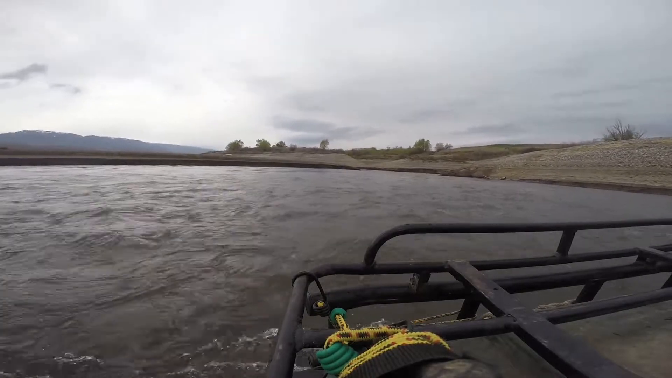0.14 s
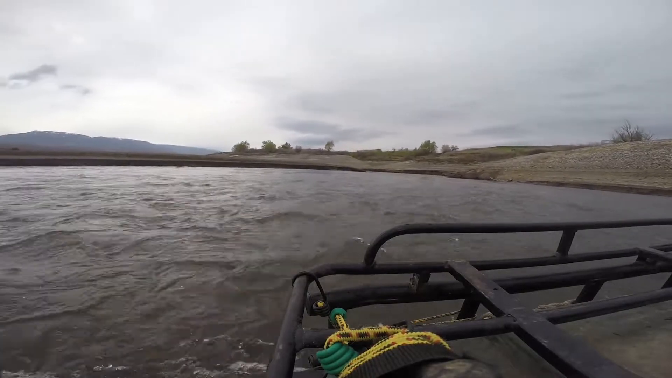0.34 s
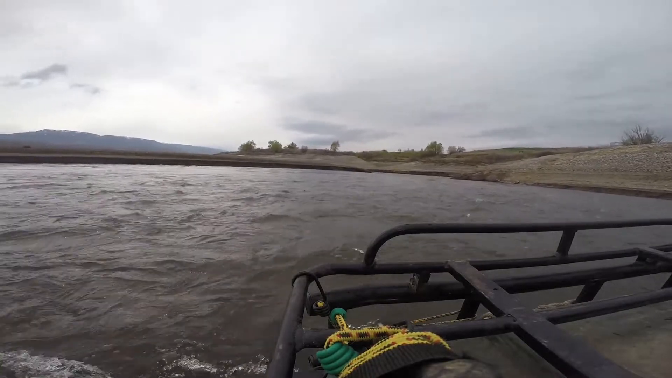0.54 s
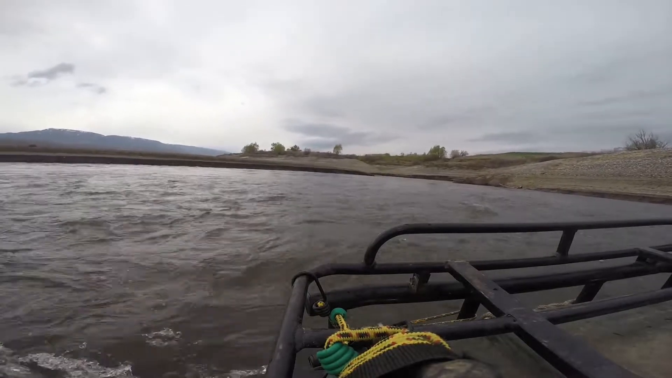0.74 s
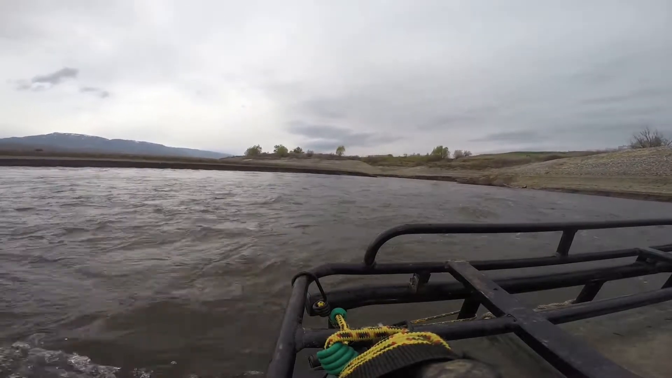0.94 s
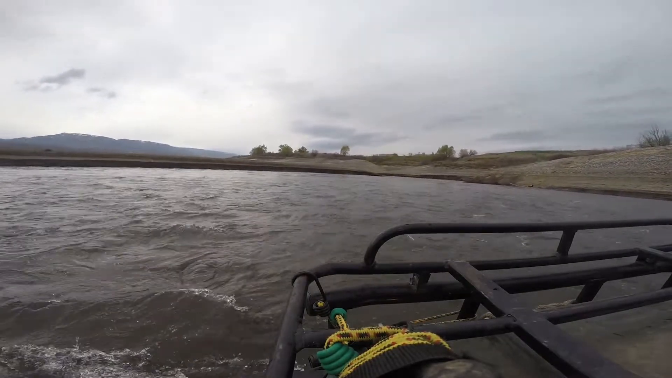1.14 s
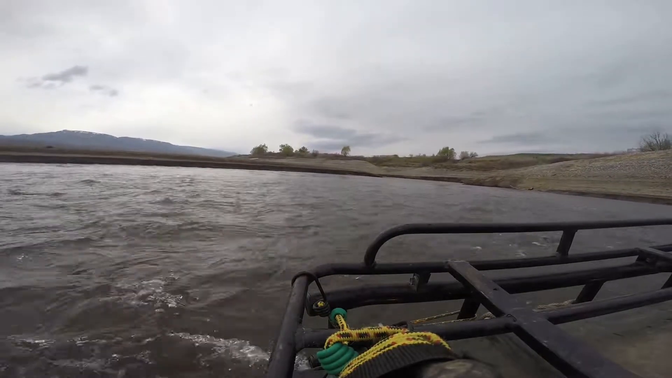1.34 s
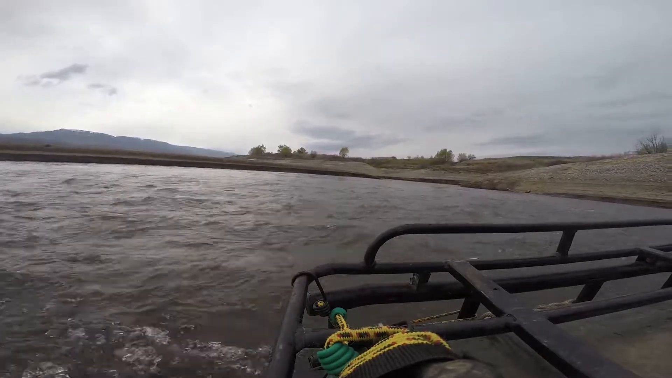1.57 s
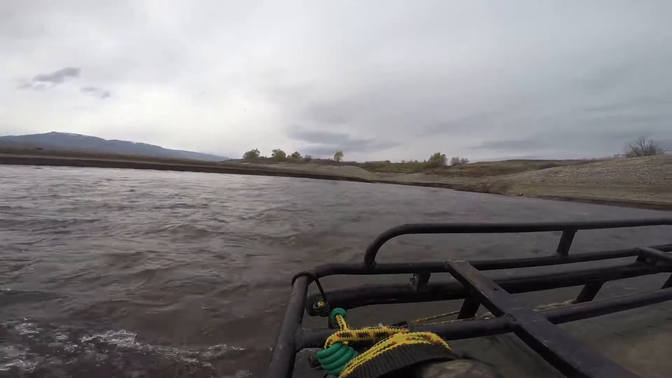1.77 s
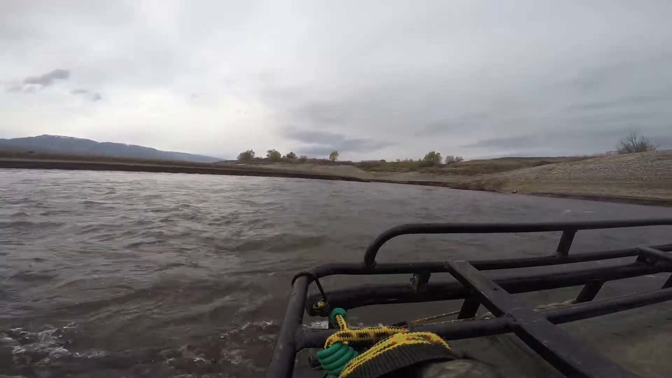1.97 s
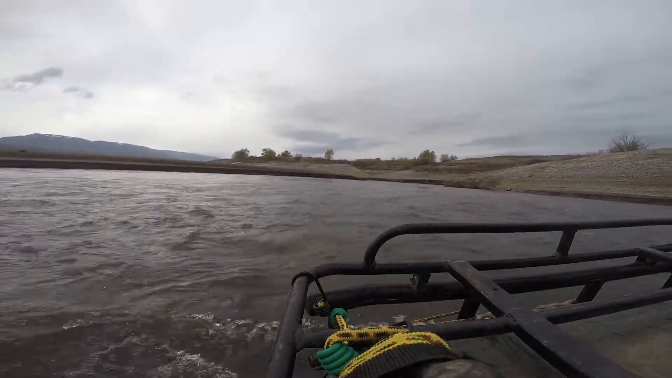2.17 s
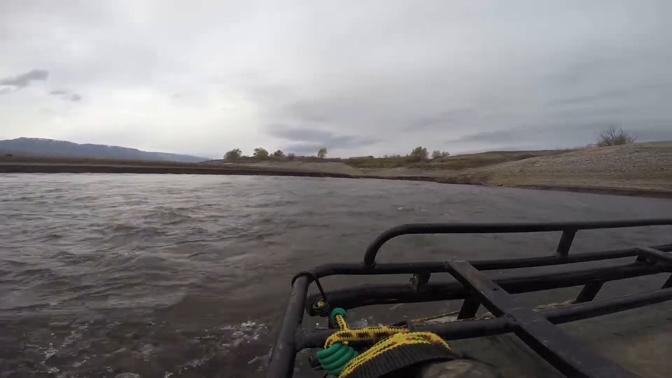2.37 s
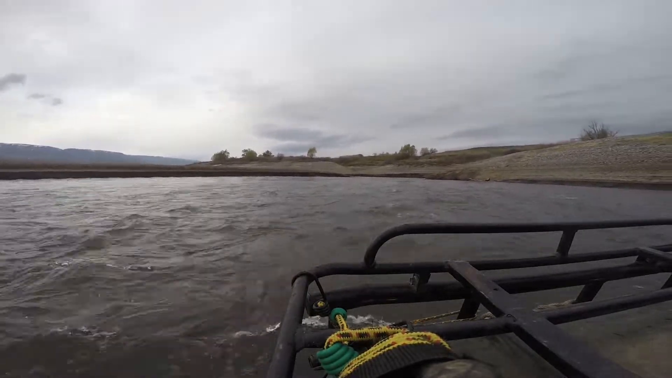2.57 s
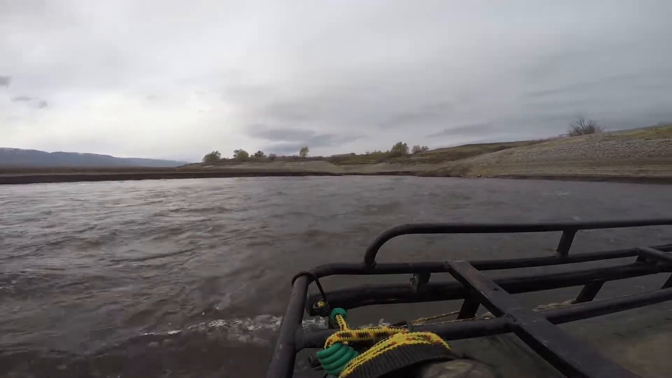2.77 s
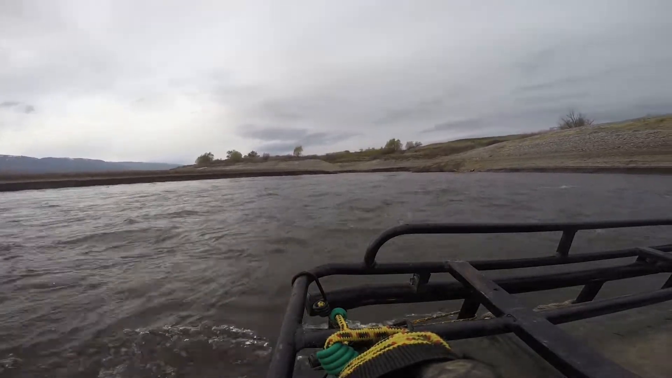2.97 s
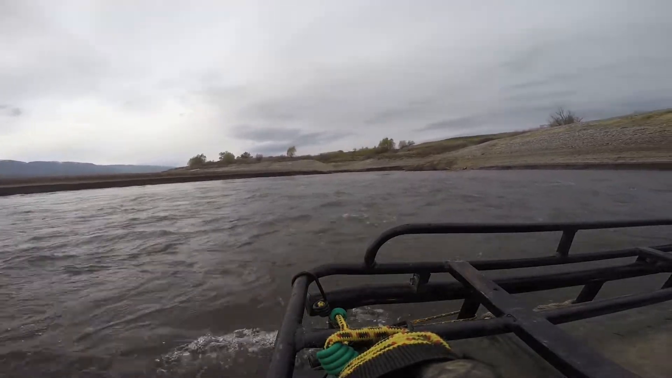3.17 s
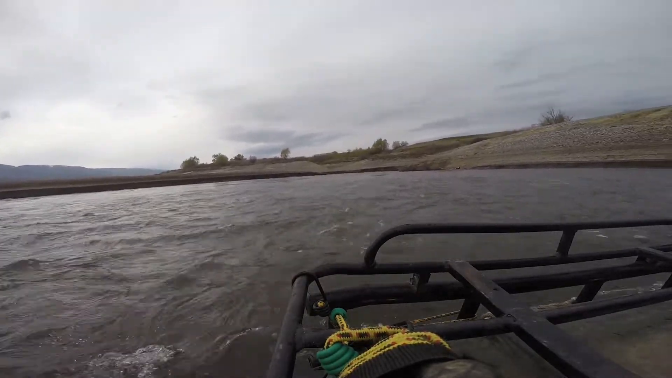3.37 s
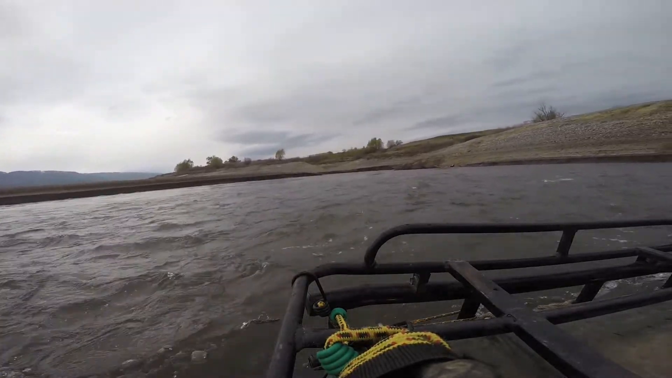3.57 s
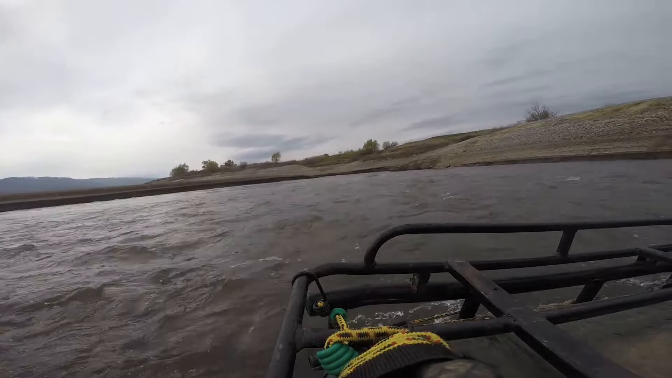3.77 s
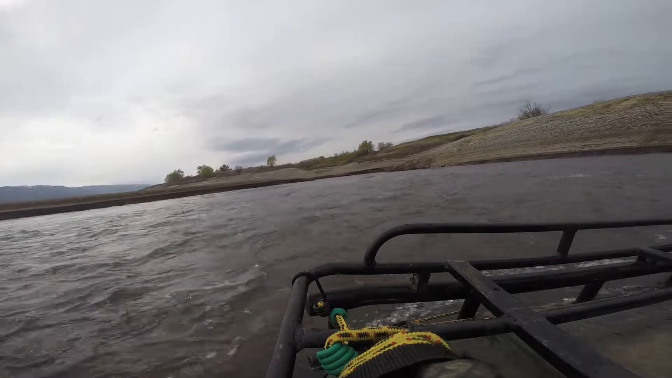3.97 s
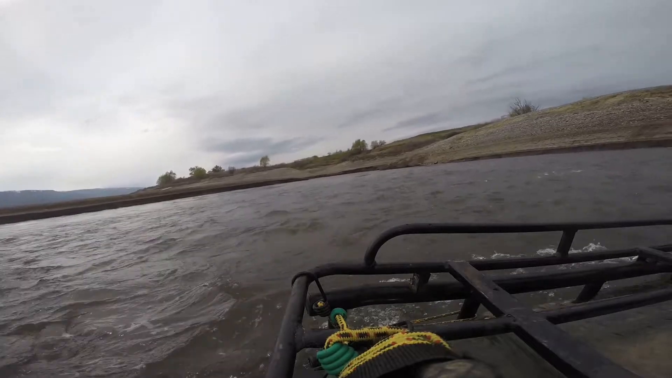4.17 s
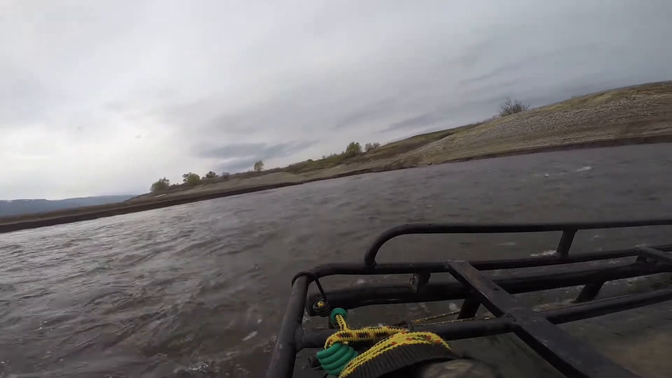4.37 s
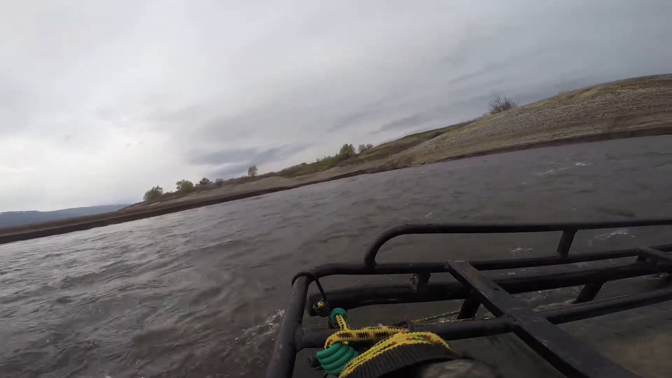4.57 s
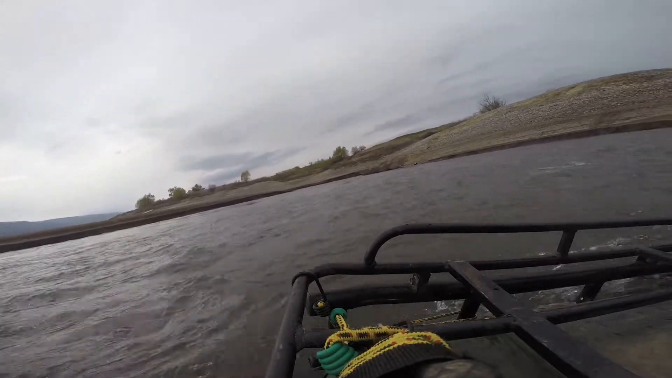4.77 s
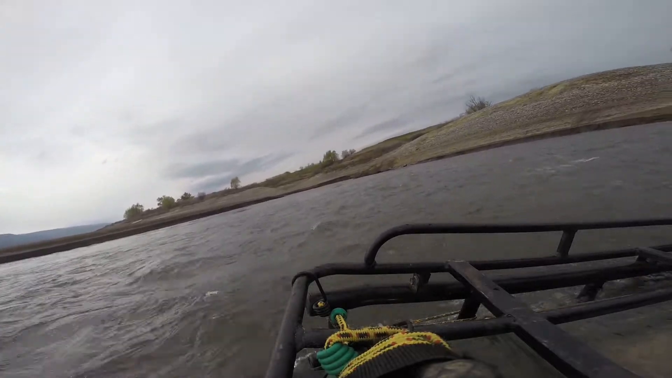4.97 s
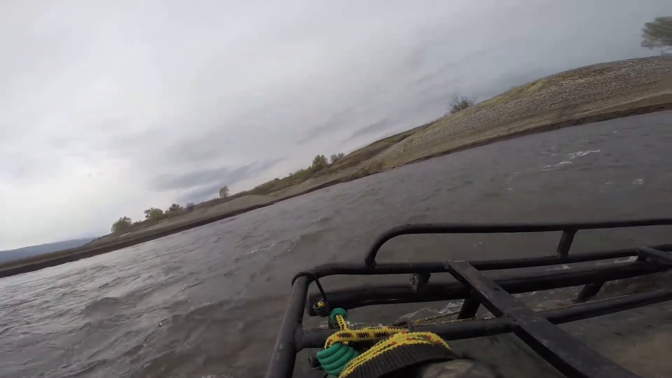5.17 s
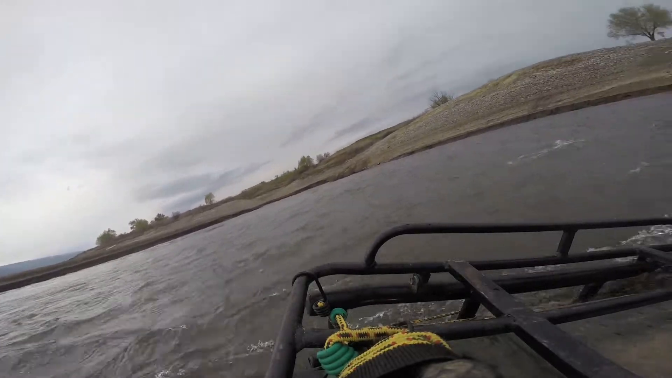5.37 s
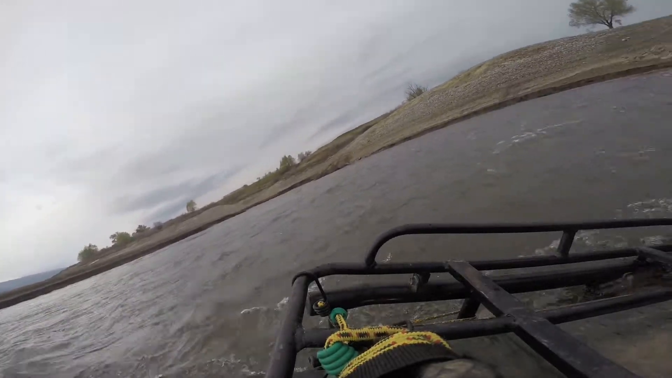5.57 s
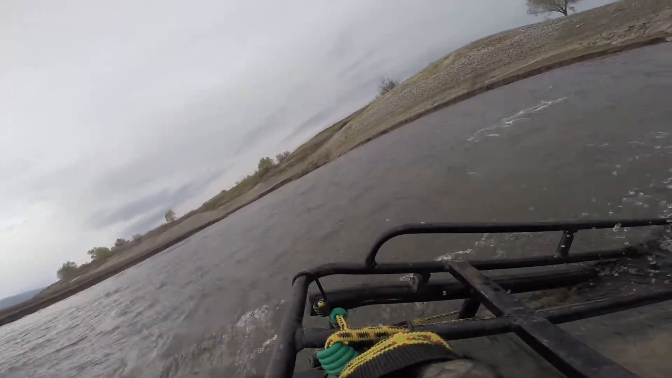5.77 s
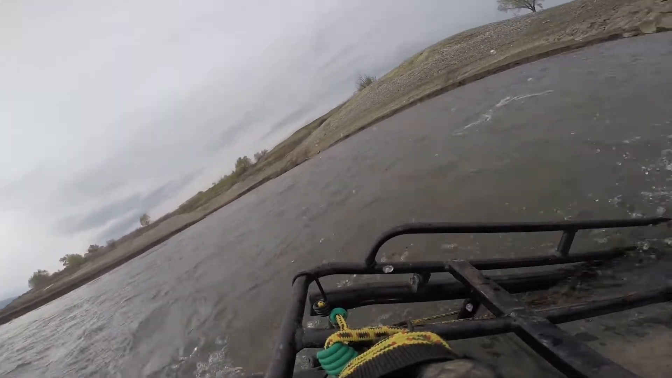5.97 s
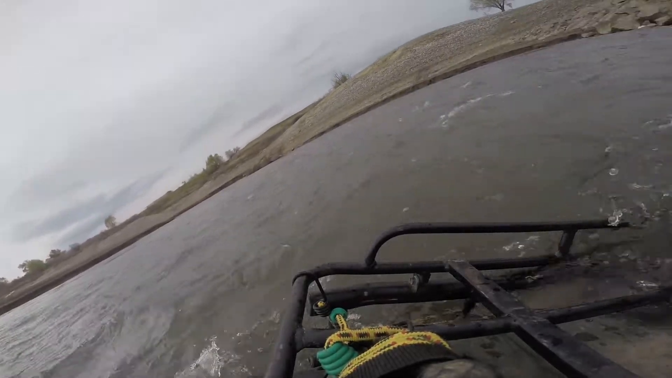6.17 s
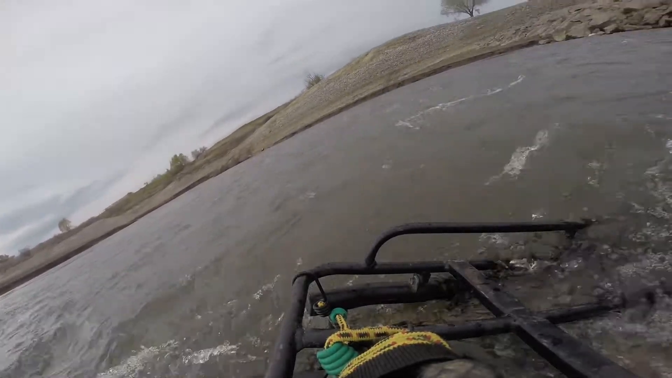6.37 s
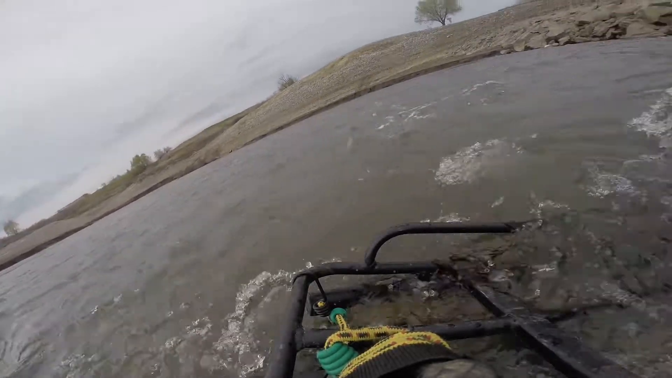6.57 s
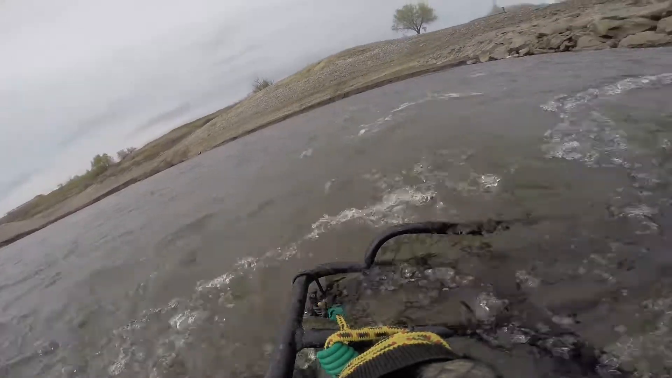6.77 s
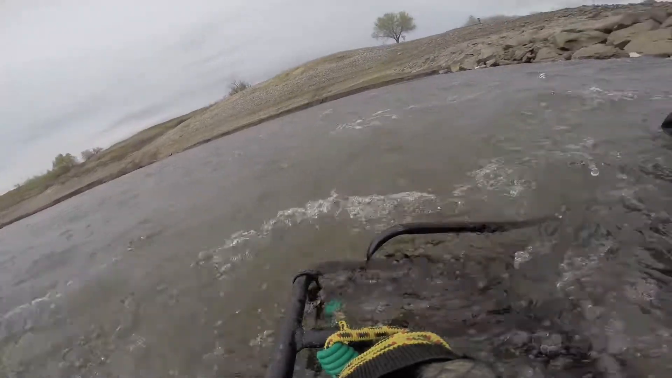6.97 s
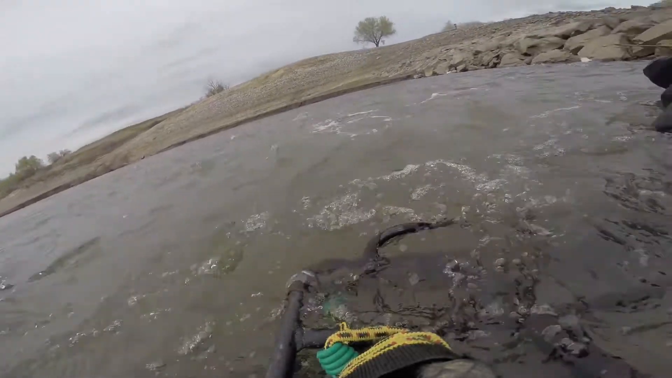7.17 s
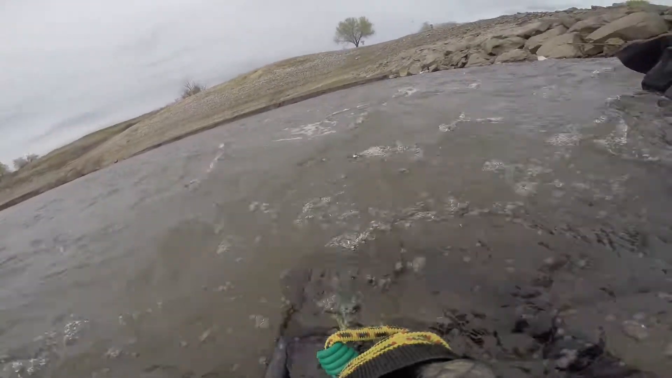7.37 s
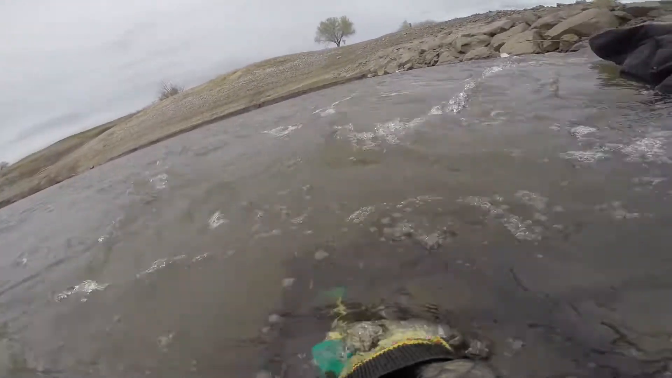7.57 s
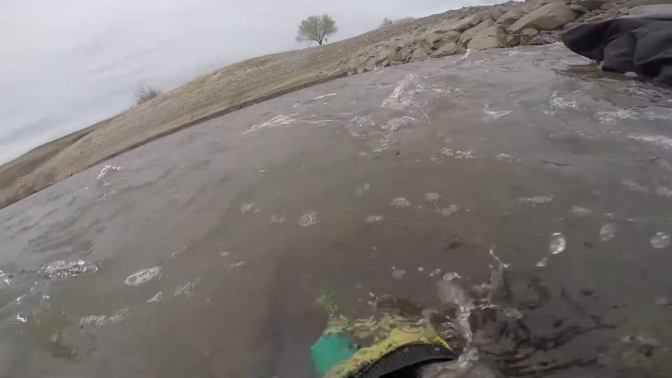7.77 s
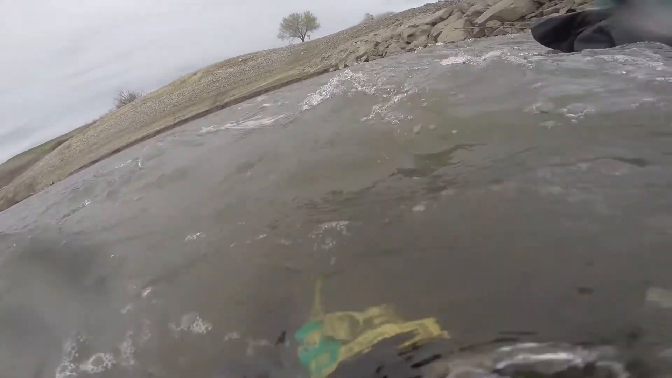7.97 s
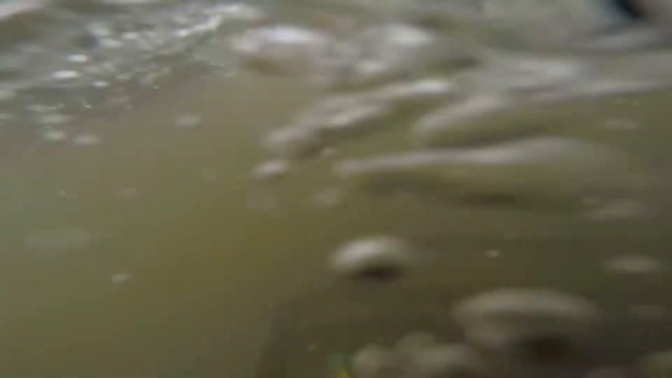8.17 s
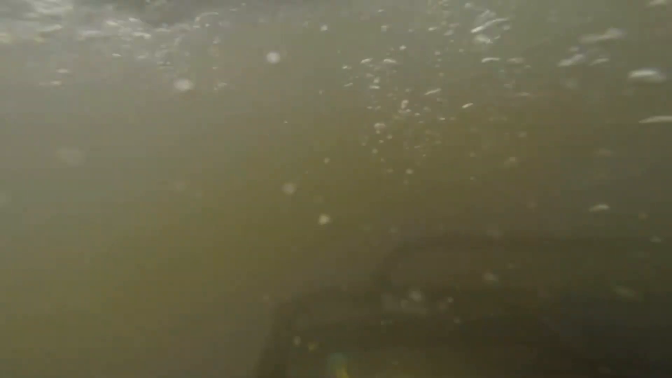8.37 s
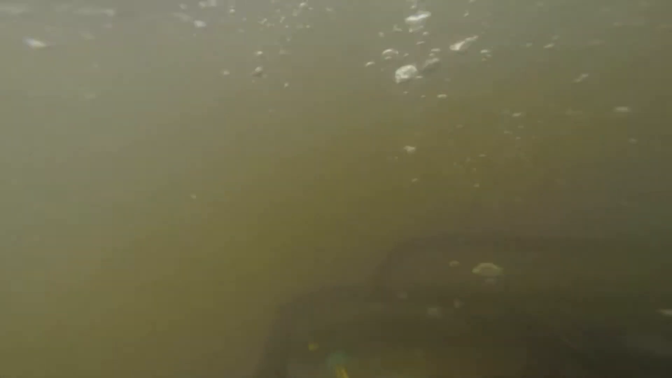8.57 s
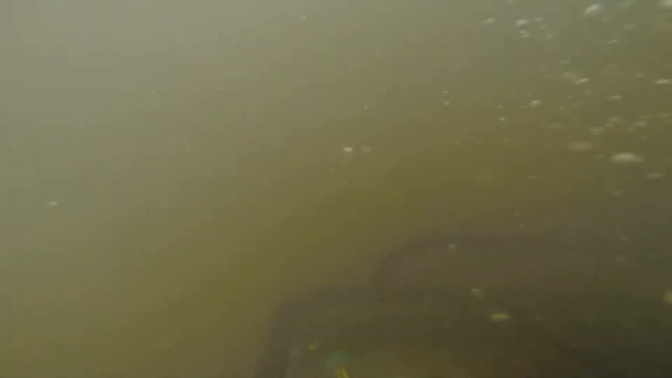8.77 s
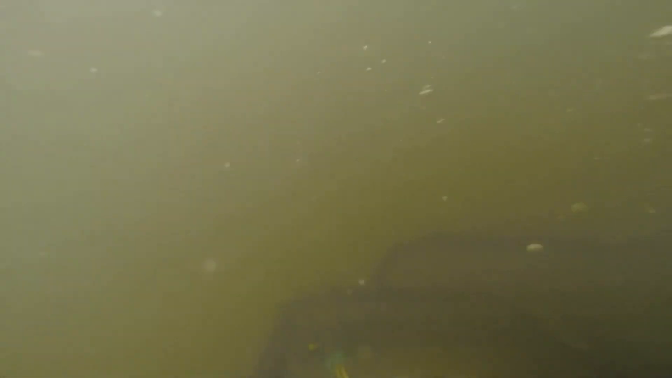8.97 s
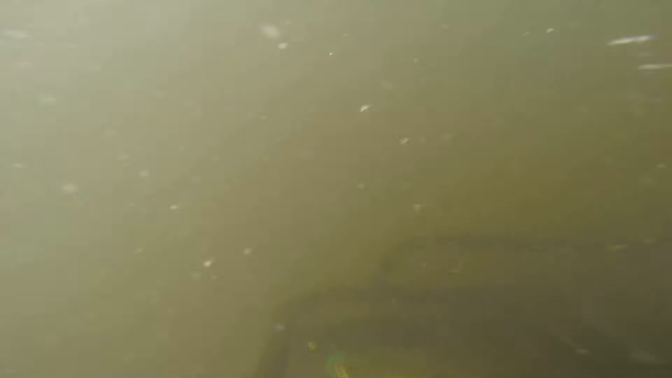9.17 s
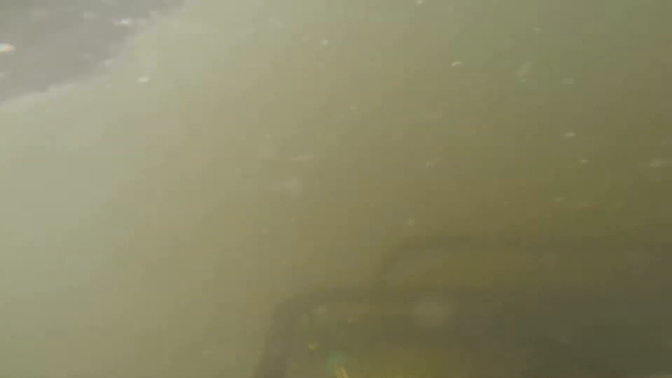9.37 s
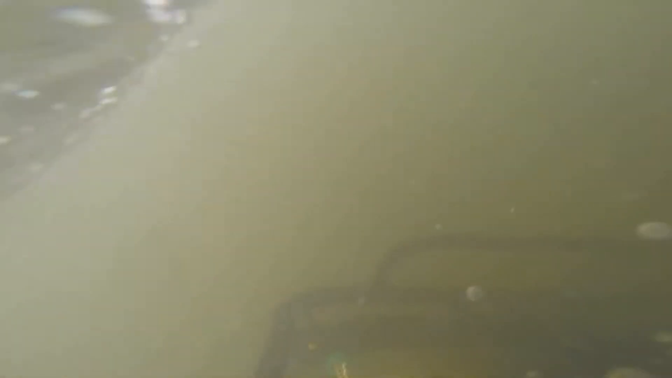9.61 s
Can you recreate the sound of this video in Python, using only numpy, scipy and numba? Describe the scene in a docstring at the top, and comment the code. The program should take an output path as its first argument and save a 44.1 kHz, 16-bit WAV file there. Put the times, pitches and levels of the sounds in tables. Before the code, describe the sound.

Heavy low rumble and boom of river current against a drifting metal frame, with light splashes, then sharp drips, a gulp and underwater gurgling.

```python
"""On a river, a quad bike is swept along and tips under; the microphone rides on it in a waterproof camera case.
Close in, the current shakes the frame into a low rumble, made of filtered noise and a wavering sine.
Around it, bubble swarms and noise make the white water; drops rap on the case, and waves knock on the body.
Waves close over it after eight seconds: a gulp of air, then gurgling bubbles and buffeting under water."""
import sys
import numpy as np
from scipy import signal
from scipy.fft import rfft, irfft, next_fast_len
from scipy.io import wavfile
from scipy.ndimage import uniform_filter1d
from numba import njit

SR = 44100
rng = np.random.default_rng(int(sys.argv[2]) if len(sys.argv) > 2 else 0)


def to_wav(s):
    """Save 16-bit WAV."""
    ch = np.atleast_2d(s).T  # columns
    pcm = np.round(np.clip(ch, -1, 1) * 32767)  # PCM
    wavfile.write(sys.argv[1], SR, pcm.astype(np.int16))


N = 425124
T = np.arange(N) / SR
SUBMERGED_S = 8.0  # from here on, water damps the case
TOP_HZ = 15500  # upper limit of the camera's sound

# Levels in the tables are relative; each source sets its own trim.
# push of the current on the floating bike: (time [s], level on the frame [dB], level on the bodywork [dB])
CURRENT = [(0, -10.5, -31), (0.35, -18.5, -27.5), (0.58, -13.5, -27), (1.25, -17, -28), (1.95, -18, -32),
           (2.8, -14.5, -27.5), (3.4, -18.5, -28.5), (4.1, -15, -27), (5.1, -15.5, -28),
           (5.6, -19.5, -30.5), (5.9, -25.5, -33), (6.4, -25.5, -38.5), (6.72, -31, -42),
           (6.86, -23.5, -32.5), (7.3, -24.5, -25.5), (7.65, -24, -38.5), (7.9, -38.5, -44),
           (8.08, -26, -29), (8.3, -58, -58)]
# push of the current on the sunken bike: (time [s], level [dB])
UNDERTOW = [(8.46, -48), (8.85, -30.5), (8.975, -19), (9.06, -22.5), (9.168, -32), (9.198, -8.5),
            (9.37, -18.5), (9.43, -23.5), (9.64, -31)]
# swells that heave the frame and make it boom: (time [s], level [dB])
HEAVES = [(0.111, -10.5), (0.46, -10.5), (1.169, -10.5), (1.689, -7.5), (2.27, -13), (5.55, -10),
          (6.07, -16.5), (6.94, -20.5), (7.43, -16), (7.78, -22)]
HEAVE_S = 0.069  # half length of a swell
# buffeting of the frame, afloat and sunk: (frequency [Hz], level [dB])
FRAME_SPECTRUM = [(20, -23.5), (40, -12), (65, -5.5), (85, -2), (108, 0), (135, -11), (165, -27.5),
                  (300, -57.5)]
SUNK_FRAME_SPECTRUM = [(20, -14), (45, -1), (95, 0), (300, -26)]
# resonances of the hollow bodywork: (frequency [Hz], level [dB])
BODYWORK_SPECTRUM = [(130, -8.5), (170, -7), (195, 1.5), (235, -17), (300, -17.5), (370, -17.5),
                     (450, -36.5), (700, -51.5)]
BOOM_HZ, BOOM_WAVER_HZ = 56.15, 3.383  # the frame's lowest resonance and the rms size of its waver
BOOM_DB, BUFFET_DB = -2.5, 1.5  # against the push of the current
SUNK_DRUM_DB, SUNK_DRUM_MAX_DB = -8.5, -40  # flooded bodywork: level against the undertow, and its ceiling

# white water: (time [s], churn level [dB], foam level [dB], spray level [dB])
WHITE_WATER = [(0.0, -45.5, -48, -59), (2.09, -45.5, -52, -66), (3.5, -46, -46, -60.5),
               (4.1, -45, -38.5, -58.5), (5.23, -49, -53.5, -67), (6.66, -48.5, -43.5, -66.5),
               (7.06, -41, -39.5, -57.5), (7.65, -46.5, -41, -60.5), (8.03, -52.5, -38.5, -46),
               (8.19, -57, -36, -56), (8.4, -44, -51, -71), (8.67, -49, -62, -69), (8.81, -37, -42.5, -72),
               (9.05, -36, -63, -86), (9.64, -35, -55, -65.5)]
# colour of the churn, and of the fine spray: (frequency [Hz], level [dB])
CHURN_SPECTRUM = [(150, -21), (300, -3.5), (520, -1.5), (760, 4.5), (1050, -10), (1300, 3.5), (1600, -32)]
SPRAY_SPECTRUM = [(2500, 3), (4000, -2.5), (4900, -9.5), (5900, -1.5), (6600, -6.5), (7600, -13),
                  (9200, -11.5), (11000, -18), (15000, -24)]
# colour of foam, froth and drops heard through the case: (frequency [Hz], level [dB])
CASE_SPECTRUM = [(300, -7.5), (750, -2.5), (1050, -13.5), (1300, -2), (1580, 5), (1980, -3.5), (2300, 3),
                 (2750, -0.5), (3050, -9.5), (3700, -20.5), (4800, -41), (7000, -55)]

# the loudest drops and bursting bubbles on the case: (time [s], level [dB], ring pitch [Hz])
DROPS = [(0.241, -27, 2130), (1.16, -25, 2230), (1.73, -28, 2380), (3.105, -23, 2600), (3.734, -13.5, 2420),
         (4.097, -8, 1860), (4.132, -12.5, 1556), (5.749, -8.5, 2556), (5.832, -20.5, 2120),
         (6.353, -26, 2220), (6.819, -12.5, 1470), (6.952, -11, 2550), (7.116, -15, 1560),
         (7.36, -15, 1490), (7.668, -29, 1480), (8.029, -13, 2660), (8.037, -9.5, 1494), (8.079, -7, 2210),
         (8.103, -9, 1464), (8.16, -11, 2140), (8.209, -6.5, 3020), (8.243, 3, 2476), (8.279, -17.5, 1930),
         (8.296, -10.5, 1500), (8.335, -17.5, 1470), (8.623, -22, 2830), (8.672, -4.5, 2284),
         (8.741, -16.5, 1180), (8.782, -21.5, 2630), (8.817, -17.5, 2300), (9.049, -17.5, 1110),
         (9.352, -17.5, 2480), (9.474, -21.5, 2760), (9.574, -13, 1940)]
# bursts of fine spray on the case: (time [s], level [dB])
SPATTERS = [(5.52, -43.5), (5.624, -29), (5.694, -44), (5.784, -39), (8.038, -12.5), (8.077, -25),
            (8.208, -30), (8.245, -21.5), (8.1, -22), (8.27, -20.5), (8.722, -43), (8.739, -34.5),
            (9.361, -31.5)]

# water slapping the body, and at the end one long, dull surge under water:
# (time [s], level [dB], decay by 60 dB [s], spatter level [dB])
SLAPS_AND_SURGE = [(5.341, -5.5, 0.064, -45), (5.364, -14, 0.095, -34.5), (5.617, -8, 0.05, -28),
                   (9.182, -27, 0.28, -68)]
# colour of the slaps and the surge: (frequency [Hz], level [dB])
SLAP_SPECTRUM = [(90, 16), (190, 17.5), (380, 1), (600, 3.5), (1020, -12), (1550, 4), (2600, -14),
                 (4000, -36), (8000, -50)]
# heavier waves thumping the bodywork: (time [s], level [dB])
THUDS = [(0.535, -23), (0.6, -24), (1.834, -25), (5.051, -15), (6.818, -22), (6.937, -22), (7.14, -24),
         (7.627, -26)]
# colour of a thump: (frequency [Hz], level [dB])
THUD_SPECTRUM = [(200, 3), (360, -0.5), (1100, -38)]
THUD_RISE_S, THUD_T60_S = 0.0071, 0.067
PANEL_HZ, PANEL_T60_S, PANEL_DB = 187, 0.19, 1  # the panel that a heavy wave sets ringing
# wavelets lapping on the bodywork: (time [s], level [dB])
LAPS = [(0.607, -31.5), (0.676, -29.5), (0.724, -29), (1.284, -30.5), (2.369, -28.5), (2.5, -30.5),
        (5.058, -29.5), (5.912, -27.5), (6.062, -28)]
# colour of a lap: (frequency [Hz], level [dB])
LAP_SPECTRUM = [(250, 11.5), (450, -3.5), (750, 3), (1050, -10), (1300, -1.5), (1600, 0.5), (2000, -7.5),
                (2500, -10.5), (3200, -20.5), (6000, -36.5)]
LAP_RISE_S, LAP_T60_S = 0.0012, 0.084
KNOCK_DB = -1  # trim for the noise of laps and thumps

# water shoving the case: (time [s], peak level [dB], width [s])
SHOVES = [(5.626, -2, 0.0033), (5.793, -7.5, 0.0029), (8.398, -4, 0.0011), (9.263, -2, 0.0029),
          (9.362, -0.5, 0.0062)]
# air escaping under water: (time [s], level [dB], central bubble pitch [Hz])
GURGLE = [(8.5, -38.5, 855), (8.68, -41, 1040), (8.85, -34.5, 760), (8.98, -35.5, 577), (9.12, -39, 564),
          (9.21, -27, 542), (9.42, -46.5, 690), (9.53, -32, 930), (9.64, -48, 850)]
# glugs under water: (time [s], peak level [dB], pitch after the scoop, before the climb [Hz])
GLUGS = [(8.741, -17, 994), (8.771, -22, 780), (8.802, -25, 1110), (8.853, -19, 740), (8.886, -20, 666),
         (8.911, -14, 870), (9.032, -19, 460), (9.107, -19, 474), (9.18, -15, 635), (9.456, -23, 830),
         (9.511, -25, 1070), (9.534, -24.5, 497), (9.608, -21, 970)]
GLUG_SCOOP, GLUG_SCOOP_S = 0.45, 0.003  # share of the pitch missing at the start, time constant
GLUG_RISE_PER_S, GLUG_CYCLES = 0.92, 35  # later climb as a share of the pitch, decay by 60 dB in cycles
# single bubbles: (time [s], level [dB], starting pitch [Hz], decay by 60 dB [s])
BUBBLES = [(0.335, -34, 1680, 0.06), (3.737, -8, 2550, 0.023), (4.119, -9.5, 728, 0.032),
           (7.19, -29, 400, 0.11), (7.357, -19, 990, 0.043), (8.095, -4, 3530, 0.01),
           (8.102, -7.5, 5900, 0.015), (8.116, 1.5, 1960, 0.012), (8.245, -3, 4120, 0.0099),
           (8.931, -23, 3580, 0.013), (8.958, -16, 3330, 0.0059), (9.385, -23.5, 554, 0.17)]
BUBBLE_RISE_PER_S = 2.5  # pitch gained each second, as a share of the starting pitch

# wavelets breaking into droplets: (time [s], level [dB], length [s])
SPLASHES = [(0.695, -31, 0.05), (3.075, -24, 0.063), (4.228, -29.5, 0.068), (5.684, -31, 0.031),
            (6.489, -37.5, 0.083), (7.583, -28, 0.033), (8.035, -14.5, 0.094), (8.16, -22, 0.055),
            (8.258, -23.5, 0.045)]
SPLASH_HZ, SPLASH_OCTAVES = 2036, 0.967  # central droplet pitch and its full spread
SPLASH_CYCLES, FROTH_DB = 58, -8.5  # mean ring length, froth against droplets
CRACKLE_S, CRACKLE_LENGTH_S, CRACKLE_DB = 1.57, 0.12, -44  # the patter's start, length and level


def undb(db):
    """Decibels to gain."""
    return 10 ** (np.asarray(db) / 20)


def unit(x):
    """Scale to rms 1."""
    return x / np.sqrt(np.mean(x ** 2))


def crest(x):
    """Scale so that the loudest two milliseconds have rms 1."""
    return x / np.sqrt(uniform_filter1d(x ** 2, SR // 500).max())


def steady(x, span_s):
    """Unit level over spans of this length; quicker flutter stays."""
    return x / np.sqrt(uniform_filter1d(x ** 2, int(span_s * SR)) + 1e-12 * np.mean(x ** 2))


def curves(table):
    """The columns of a table, joined by straight lines in time."""
    s, *columns = np.transpose(table)
    return [np.interp(T, s, c) for c in columns]


def walk(rate):
    """Smooth random wandering, rms 1, through this many random points a second."""
    knots = rng.standard_normal(4096)
    path = np.interp(T * rate, np.arange(len(knots)), knots)
    return unit(uniform_filter1d(path, int(SR / rate / 2)))


def fade(t, t60):
    """Exponential decay by 60 dB in t60 seconds."""
    return np.exp(-np.log(1000) * t / t60)


def add(out, s, x):
    """Mix a short sound in at time s."""
    i = int(s * SR)
    out[i:i + len(x)] += x[:max(N - i, 0)]


def colour(x, spectrum):
    """Causal minimum-phase filter through (frequency [Hz], level [dB]) points, falling off beyond them."""
    hz, db = np.transpose(spectrum)
    size = 2 * next_fast_len(len(x) // 2 + 1)
    f = np.maximum(np.fft.rfftfreq(size, 1 / SR), 1)
    falloff = np.maximum(f / hz[-1], 1) ** 2 * np.maximum(hz[0] / f, 1)
    gain_db = np.interp(np.log(f), np.log(hz), db) - 20 * np.log10(falloff)
    # folding the cepstrum onto positive times makes the filter causal
    cepstrum = irfft(np.log(undb(gain_db)))
    cepstrum[1:size // 2] *= 2
    cepstrum[size // 2 + 1:] = 0
    return irfft(rfft(x, size) * np.exp(rfft(cepstrum)))[:len(x)]


@njit
def ring(starts, hz, cycles, size, rise):
    """Bubbles: damped sines whose pitch glides by the share "rise" over each life."""
    out = np.zeros(N)
    for k in range(len(starts)):
        first = int(starts[k] * SR)
        length = int(cycles[k] * SR / hz[k]) + 1
        phase = 0.
        for i in range(min(length, N - first)):
            age = i / length
            phase += 2 * np.pi * hz[k] * (1 + rise * age) / SR
            envelope = np.exp(-6.9 * age) * (1 - np.exp(-phase / 2))
            out[first + i] += size[k] * envelope * np.sin(phase)
    return out


def swarm(centre_hz, octaves, cycles, scatter_db, rise, count):
    """Bubbles at random times, up to "octaves" either side of a pitch; most are small, a few large."""
    when, pitch, life, size = rng.random((count, 4)).T
    centre = (centre_hz + np.zeros(N))[(when * N).astype(int)]
    hz = np.minimum(centre * 2 ** (octaves * (2 * pitch - 1)), SR / 3)
    size_db = -scatter_db * np.log(size + .004)
    return ring(when * N / SR, hz, cycles * (.5 + life), undb(size_db), float(rise))


def rumble():
    """The current buffets the frame in lumps and drums on the bodywork; swells boom its lowest resonance."""
    afloat = T < CURRENT[-1][0]
    frame_db, panel_db = curves(CURRENT)
    sunk_db, = curves(UNDERTOW)
    push_db = np.where(afloat, frame_db, sunk_db - 1.5)
    flooded_db = np.minimum(sunk_db + SUNK_DRUM_DB, SUNK_DRUM_MAX_DB)
    drum_db = np.where(afloat, panel_db, flooded_db)
    eddy_db = 1.5 * walk(17)

    heave = sum(undb(db) * np.exp(-((T - s) / HEAVE_S) ** 2) for s, db in HEAVES)
    sway = np.hypot(heave, undb(push_db + BOOM_DB + 3.2 * walk(9)))
    boom_hz = BOOM_HZ + BOOM_WAVER_HZ * walk(24)
    boom = np.sqrt(2) * np.sin(2 * np.pi * np.cumsum(boom_hz) / SR)

    lumps = undb(2.5 * walk(45))
    eddies = lumps * rng.standard_normal(N)
    floating = unit(colour(eddies, FRAME_SPECTRUM))
    sunken = unit(colour(eddies, SUNK_FRAME_SPECTRUM))
    buffet = steady(np.where(afloat, floating, sunken), 0.14)
    drum = steady(colour(lumps * rng.standard_normal(N), BODYWORK_SPECTRUM), 0.2)
    return (boom * sway * undb(2.0 * walk(28))
            + buffet * undb(push_db + BUFFET_DB + eddy_db)
            + drum * undb(drum_db + 1.35 * eddy_db))


def white_water():
    """Churn, foam and spray around the bike: bubble swarms over hiss, the hiss sinking under water."""
    churn_db, foam_db, spray_db = curves(WHITE_WATER)
    hiss = rng.standard_normal((3, N)) * undb(np.interp(T, [8.15, 8.35], [0, -7]))
    # as the bike tilts, the water comes closer, and single bubbles stand out of the wash
    near = np.interp(T, [5.0, 6.0, 8.15, 8.35], [0.6, 1.16, 1.16, 1.22])

    deep = unit(swarm(700, .9, 26, 3.6, .15, count=1300))
    churn_hiss = colour(hiss[0], [(250, 0.0078), (1500, 0.0034)])
    churn = near * deep + undb(6.5) * churn_hiss

    plops = unit(swarm(1900, .8, 46, 4.2, .1, count=2400))
    fine_foam = unit(swarm(1990, 1.2, 36, 5.0, 0.053, count=7000))
    foam = near * plops + undb(-8.5) * fine_foam + undb(5.0) * hiss[1]

    fizz = unit(swarm(7000, .87, 36, 3.7, .08, count=7000))
    spray = near * fizz + undb(3.5) * hiss[2]

    lap_db = 0.58 * walk(16.0) + 2.0 * walk(35)
    wash = (unit(colour(churn, CHURN_SPECTRUM)) * undb(churn_db - 0.5)
            + unit(colour(foam, CASE_SPECTRUM)) * undb(foam_db + 1.0)
            + unit(colour(spray, SPRAY_SPECTRUM)) * undb(spray_db + 3.8))
    return wash * undb(lap_db)


def spatter(t, t60, count=90):
    """A brief burst of fine droplets, so many and so short that they merge into a wet hiss."""
    when, pitch, size = rng.random((count, 3)).T
    delay = t60 * when
    loudness = size ** 2 * fade(delay, 2 * t60)
    pings = ring(delay, 3000 * 4 ** pitch, 4 + 10 * size, loudness, 0.)[:len(t)]
    mist = rng.standard_normal(len(t)) * fade(t, 2 * t60)
    swell = (1 - np.exp(-t / .0022)) ** 3
    return crest(colour(crest(pings * swell) + crest(mist * swell), SPRAY_SPECTRUM))


def drops():
    """On the case itself: each drop rattles it, rings an air pocket and trails off; water damps it later."""
    out, t = np.zeros(N), T[:SR // 6]
    swell = (1 - np.exp(-t / 0.0009)) ** 2
    for s, db, hz in DROPS:
        if s < SUBMERGED_S:
            t60, rattle_db, trail_db, bend_per_s = 0.04, -3.5, -20, -0.3
        else:
            t60, rattle_db, trail_db, bend_per_s = 0.01, -4, -27.5, -5
        envelope = swell * (fade(t, t60) + undb(trail_db) * fade(t, 0.14))
        rattle = crest(colour(rng.standard_normal(len(t)) * envelope, CASE_SPECTRUM))
        pocket = crest(np.sin(2 * np.pi * hz * t * (1 + bend_per_s * t)) * swell * fade(t, 0.03))
        drop = undb(rattle_db) * rattle + undb(-5) * pocket + undb(-31) * spatter(t, 0.014)
        add(out, s, undb(db - 5.0) * drop)
    for s, db in SPATTERS:
        add(out, s, undb(db) * spatter(t, 0.017))
    return out


def slaps_and_surge():
    """Water slaps the body, and at the end comes one long, dull surge under water: noise bursts and spatter."""
    out, t = np.zeros(N), T[:SR // 4]
    for s, db, t60, spatter_db in SLAPS_AND_SURGE:
        noise = rng.standard_normal(len(t)) * (1 - np.exp(-t / 0.0024)) ** 2 * fade(t, t60)
        burst = crest(colour(noise, SLAP_SPECTRUM))
        add(out, s, undb(db) * burst + undb(spatter_db) * spatter(t, 0.014))
    return out


def knocks(table, spectrum, rise_s, t60):
    """Waves knock softly on the hollow bodywork: short bursts of coloured noise."""
    out, t = np.zeros(N), T[:SR // 5]
    for s, db in table:
        knock = rng.standard_normal(len(t)) * (1 - np.exp(-t / rise_s)) * fade(t, t60)
        add(out, s, undb(db + KNOCK_DB) * crest(colour(knock, spectrum)))
    return out


def thuds():
    """A heavy wave thumps the bodywork and leaves its largest panel ringing."""
    out, t = np.zeros(N), T[:SR // 4]
    swell = 1 - np.exp(-t / THUD_RISE_S)
    panel = crest(np.sin(2 * np.pi * PANEL_HZ * t) * swell * fade(t, PANEL_T60_S))
    for s, db in THUDS:
        add(out, s, undb(db + PANEL_DB) * panel)
    return out + knocks(THUDS, THUD_SPECTRUM, THUD_RISE_S, THUD_T60_S)


def shoves():
    """Water shoves the case: a pressure swing of suction, a push, suction again."""
    out = np.zeros(N)
    for s, db, width in SHOVES:
        u = (T - s) / width
        out += undb(db) * (1 - 2 * u ** 2) * np.exp(-np.minimum(u ** 2, 50))
    return out


def gulp(s=8.397, hz=365, doubling_s=0.134, db=-12):
    """Escaping air as the water closes: the pocket's pitch bends up as it shrinks, and it breaks into fizz."""
    out, t = np.zeros(N), T[:SR // 10]
    phase = 2 * np.pi * np.cumsum(hz * (1 + t / doubling_s)) / SR
    pocket = np.sin(phase) * fade(t, .11) * (1 - np.exp(-phase))
    burst = rng.standard_normal(len(t)) * fade(t, 0.043)
    fizz = colour(burst, [(800, 8.5), (1700, 7), (2400, -13.0)])
    add(out, s, undb(db) * pocket)
    add(out, s + 0.0044, undb(-19) * crest(fizz))
    return out


def gurgle():
    """Air burbles from the sunken frame, rising in pitch; smaller bubbles chirp downward, the finest tick."""
    db, hz = curves(GURGLE)
    under = np.clip((T - GURGLE[0][0]) / 0.12, 0, 1)
    short_bubbles = swarm(hz, .85, 17, 2.6, .15, count=2800)
    long_bubbles = swarm(hz, .7, 36, 2.6, .04, count=800)
    burble = steady(short_bubbles + .6 * long_bubbles, .12)
    chirps = steady(swarm(1700, .55, 40, 4.0, -.08, count=1100), .25)
    ticks = unit(swarm(6200, .9, 16, 7, .06, count=500))
    air = burble * undb(db - 1.0) + chirps * undb(.5 * db - 31.5) + ticks * undb(-66)
    return under * undb(1.5 * walk(27)) * air


def glugs():
    """A bubble tears loose: its pitch scoops up as the neck closes, then creeps higher; large ones ring longer."""
    out, t = np.zeros(N), T[:SR // 5]
    scoop = np.exp(-t / GLUG_SCOOP_S)
    for s, db, hz in GLUGS:
        pitch = hz * (1 - GLUG_SCOOP * scoop) * (1 + GLUG_RISE_PER_S * t)
        envelope = (1 - scoop) * fade(t, GLUG_CYCLES / hz)
        tone = np.sin(2 * np.pi * np.cumsum(pitch) / SR)
        add(out, s, undb(db) * envelope / envelope.max() * tone)
    return out


def single_bubbles():
    """Bubbles that stand out alone, each rising in pitch for as long as it rings."""
    out = np.zeros(N)
    for s, db, hz, t60 in BUBBLES:
        rise = float(BUBBLE_RISE_PER_S * t60)
        out += ring(np.array([s]), np.array([float(hz)]), np.array([hz * t60]), undb([db]), rise)
    return out


def splashes(count=22):
    """A wavelet breaks into a cluster of droplets, each ringing a small bubble, over a patch of froth."""
    out, t = np.zeros(N), T[:SR // 5]
    for s, db, length in SPLASHES:
        when, pitch, life, size = rng.random((count, 4)).T
        delay = length * (np.arange(count) + when) / count
        hz = SPLASH_HZ * 2 ** (SPLASH_OCTAVES * (pitch - .5))
        droplets = ring(delay, hz, SPLASH_CYCLES * (.5 + life), size, 0.062)[:len(t)]
        patch = rng.standard_normal(len(t)) * np.exp(-(2 * t / length - 1) ** 2)
        froth = colour(patch, CASE_SPECTRUM)
        add(out, s, undb(db) * crest(crest(droplets) + undb(FROTH_DB) * crest(froth)))
    return out


def crackle(count=24):
    """A short, faint patter of very fine, dry ticks: filtered single-sample clicks."""
    when, size = rng.random((count, 2)).T
    ticks = np.zeros(N)
    ticks[((CRACKLE_S + CRACKLE_LENGTH_S * when) * SR).astype(int)] = size
    return undb(CRACKLE_DB) * crest(colour(ticks, [(2500, 2.0), (6500, -11)]))


def scene():
    """Everything reaches the one microphone in the case."""
    blows = slaps_and_surge() + thuds() + knocks(LAPS, LAP_SPECTRUM, LAP_RISE_S, LAP_T60_S)
    water = white_water() + drops() + blows + splashes() + crackle()
    air = gulp() + gurgle() + glugs() + single_bubbles()
    return (rumble() + water + shoves() + air)[None]


def record(dry):
    """The camera rounds the highest peaks and cuts the top."""
    rounded = dry / (1 + (dry / .95) ** 8) ** (1 / 8)
    low_pass = signal.ellip(8, .2, 70, TOP_HZ, fs=SR, output="sos")
    return signal.sosfilt(low_pass, rounded)


dry = scene()
out = record(dry)
to_wav(out)
```